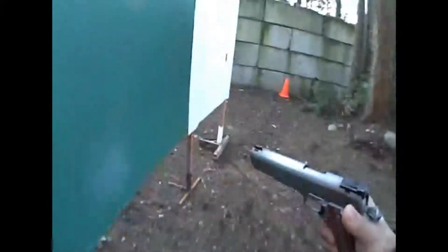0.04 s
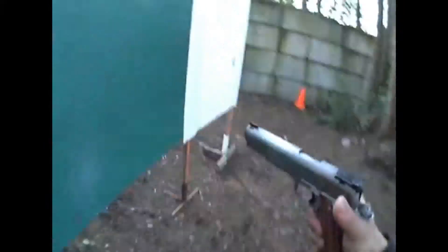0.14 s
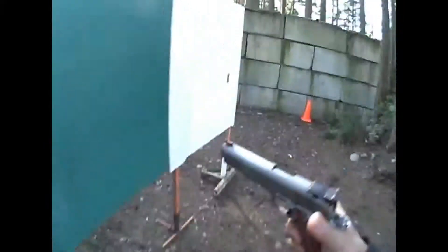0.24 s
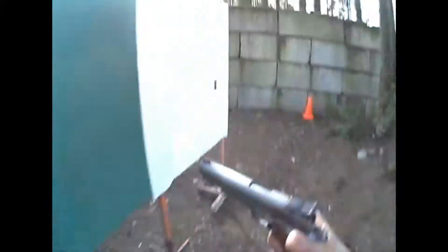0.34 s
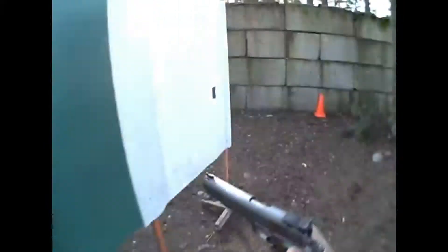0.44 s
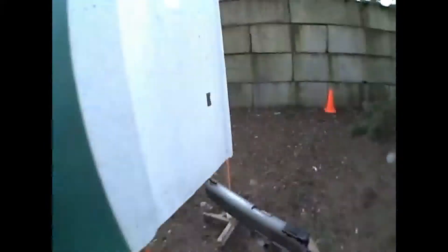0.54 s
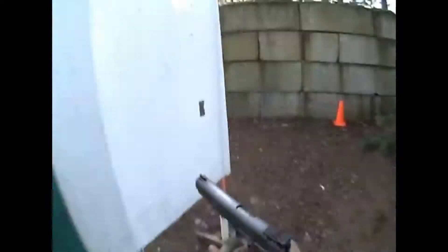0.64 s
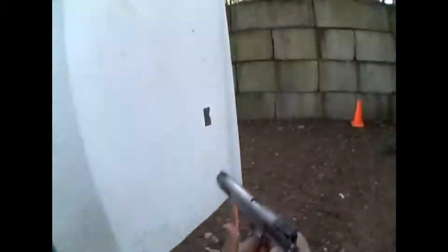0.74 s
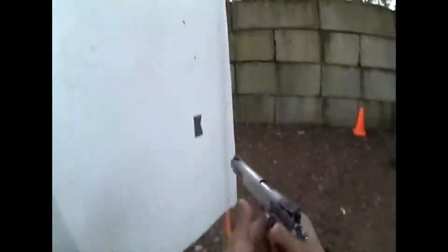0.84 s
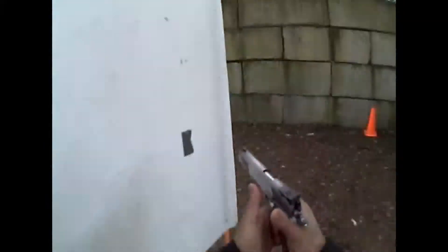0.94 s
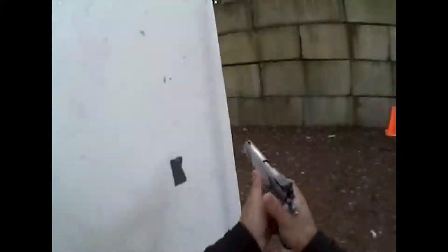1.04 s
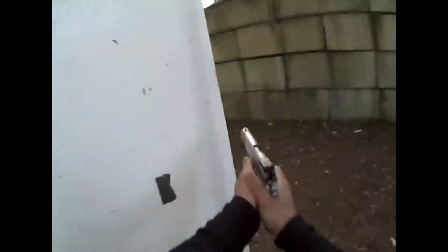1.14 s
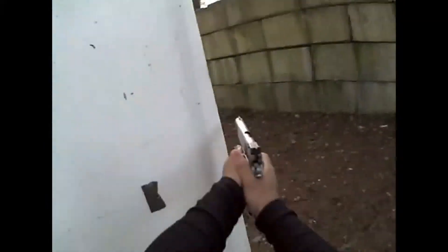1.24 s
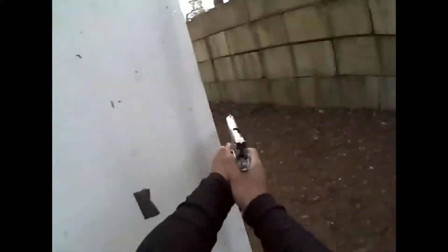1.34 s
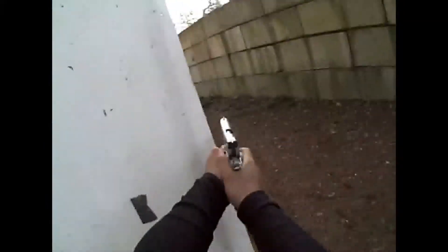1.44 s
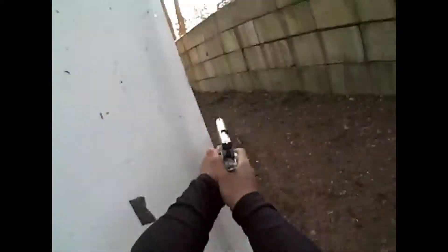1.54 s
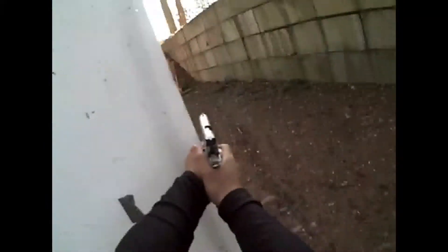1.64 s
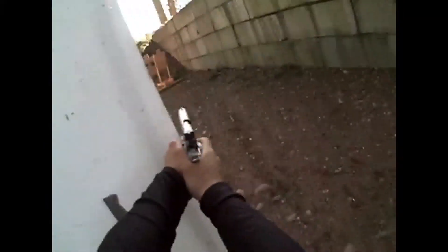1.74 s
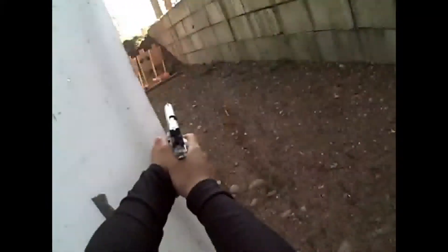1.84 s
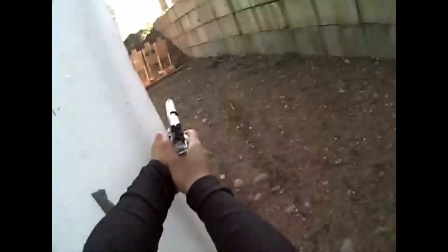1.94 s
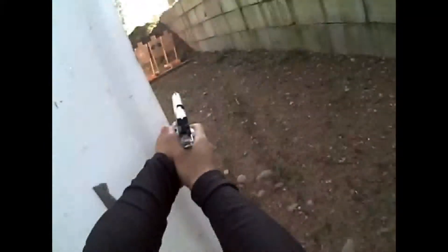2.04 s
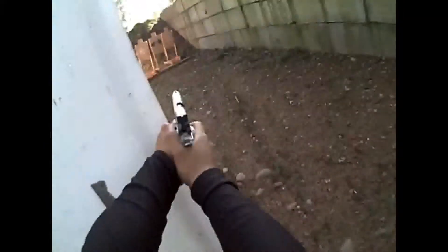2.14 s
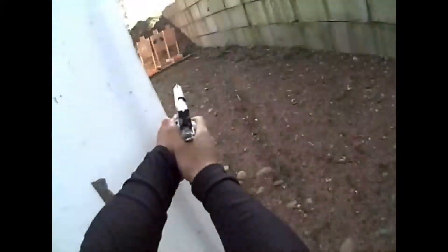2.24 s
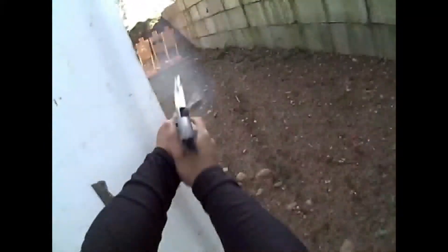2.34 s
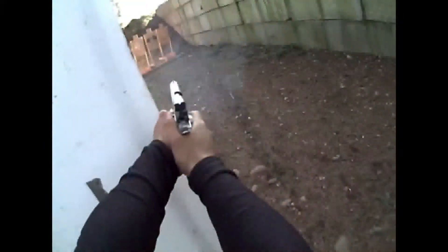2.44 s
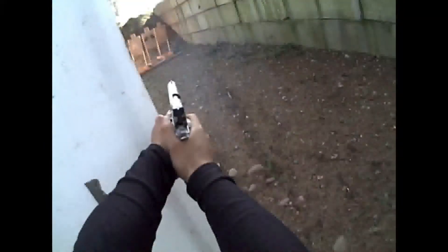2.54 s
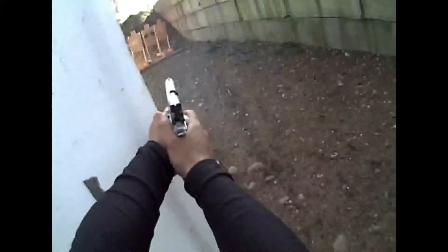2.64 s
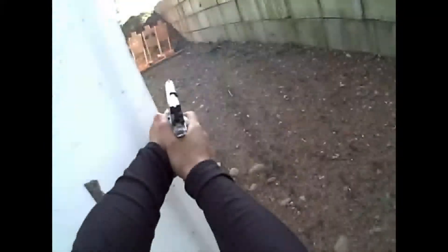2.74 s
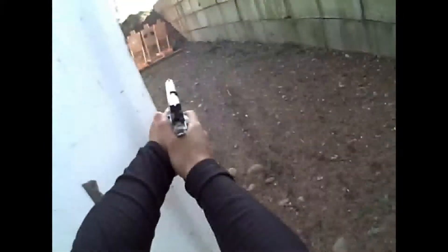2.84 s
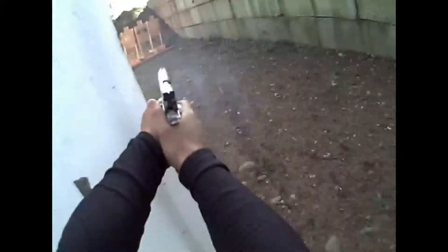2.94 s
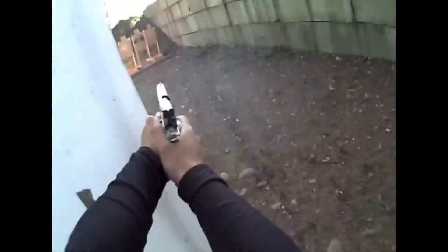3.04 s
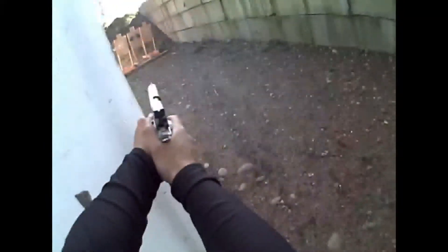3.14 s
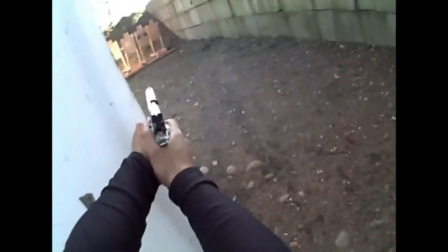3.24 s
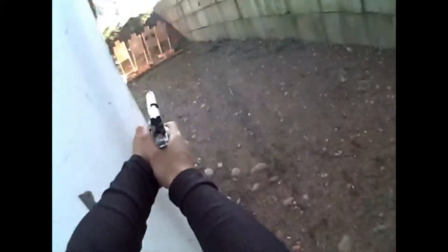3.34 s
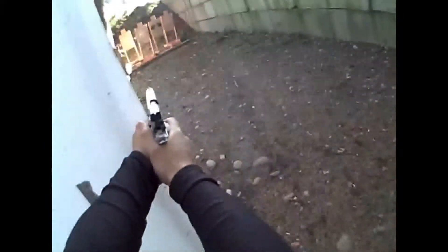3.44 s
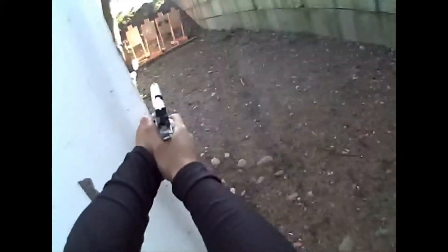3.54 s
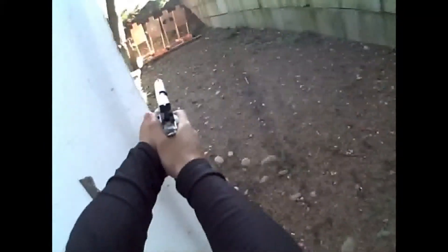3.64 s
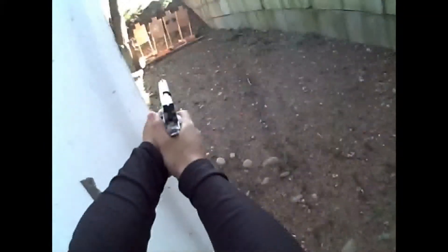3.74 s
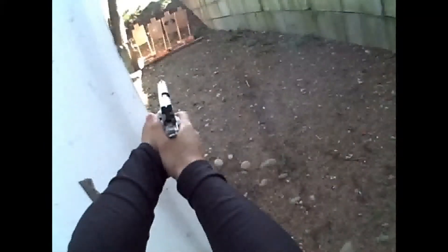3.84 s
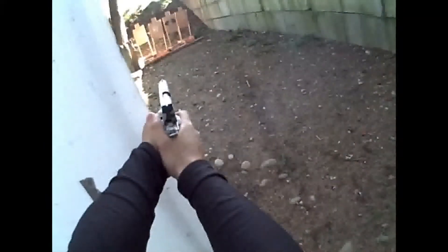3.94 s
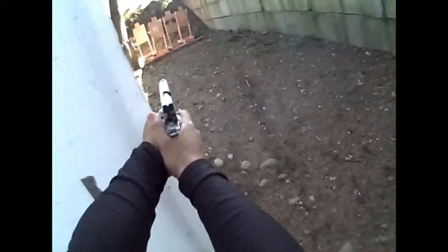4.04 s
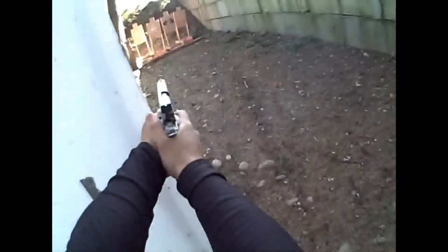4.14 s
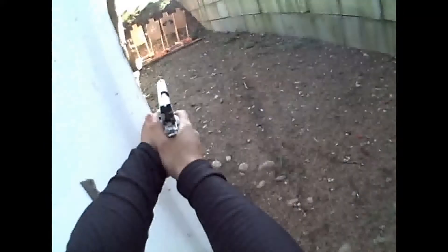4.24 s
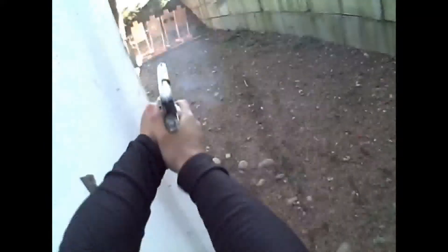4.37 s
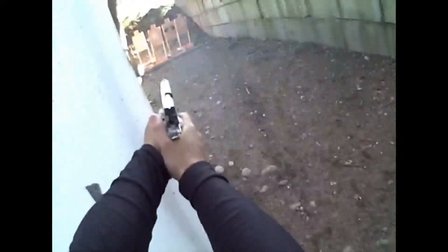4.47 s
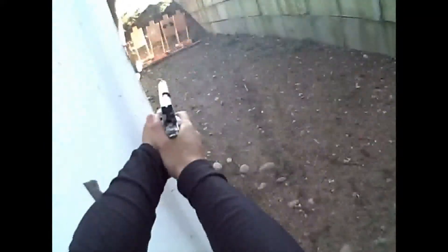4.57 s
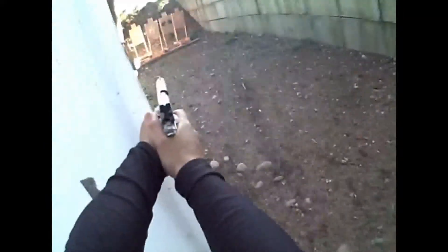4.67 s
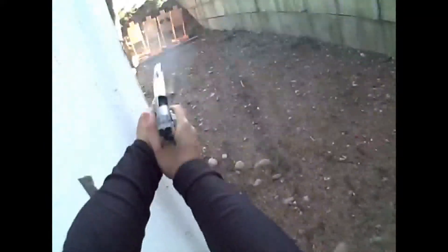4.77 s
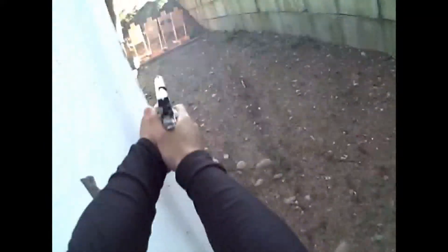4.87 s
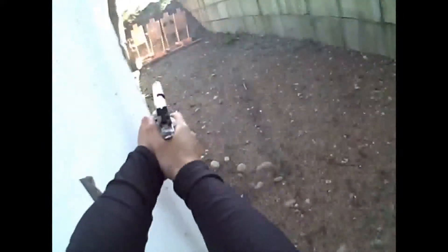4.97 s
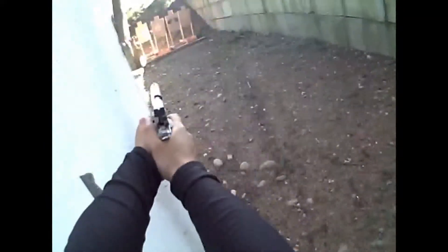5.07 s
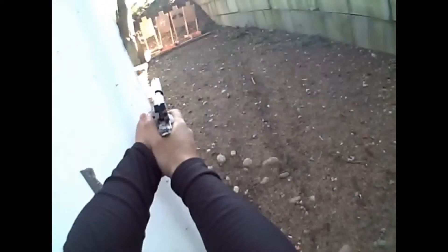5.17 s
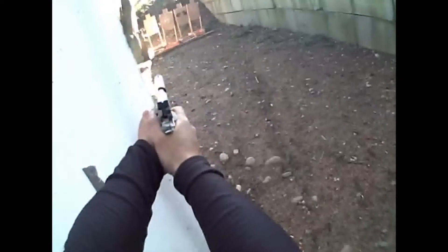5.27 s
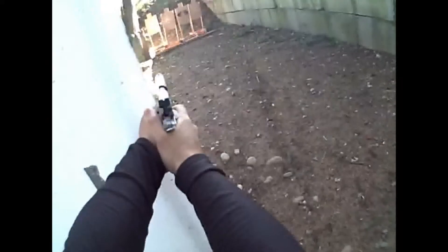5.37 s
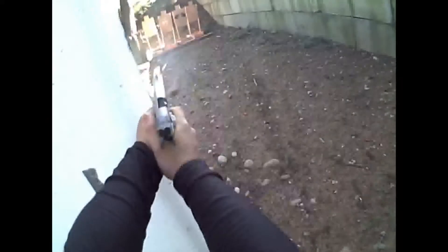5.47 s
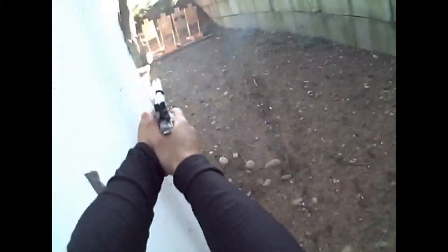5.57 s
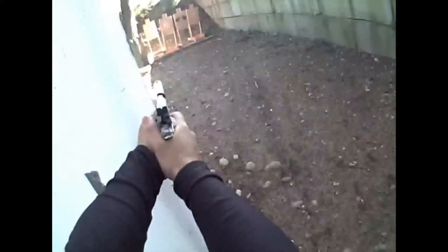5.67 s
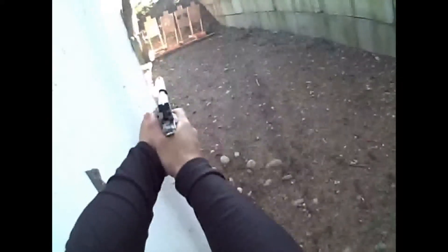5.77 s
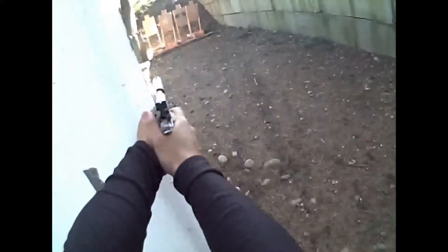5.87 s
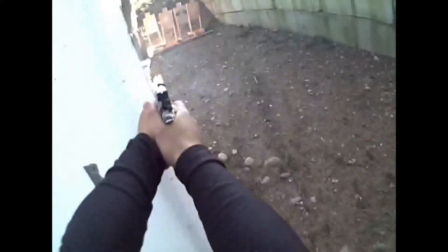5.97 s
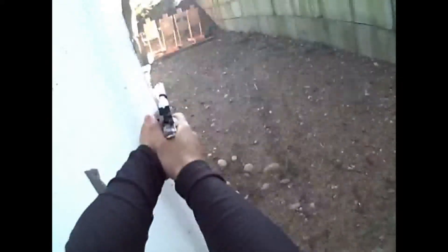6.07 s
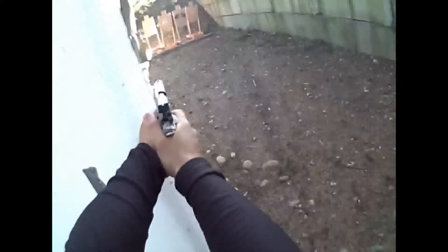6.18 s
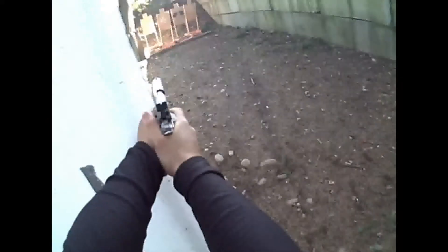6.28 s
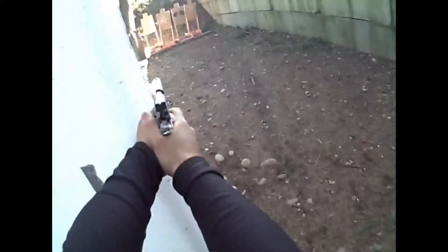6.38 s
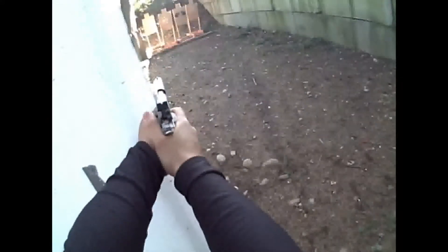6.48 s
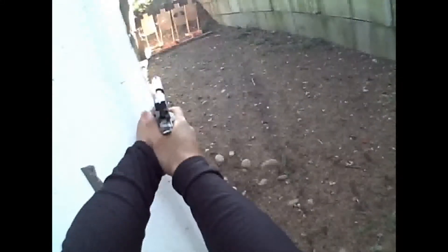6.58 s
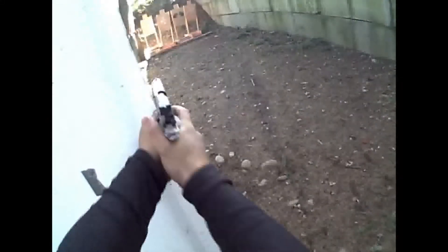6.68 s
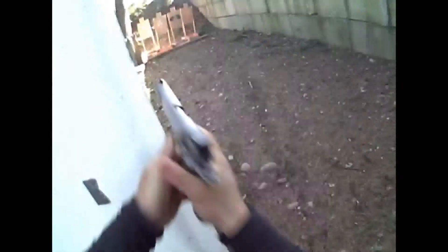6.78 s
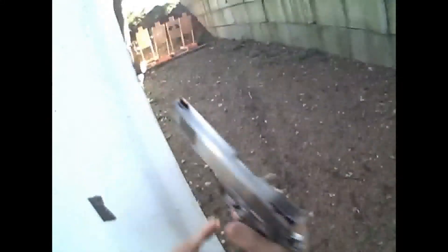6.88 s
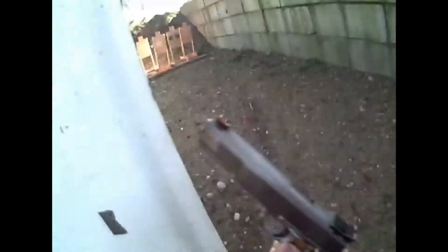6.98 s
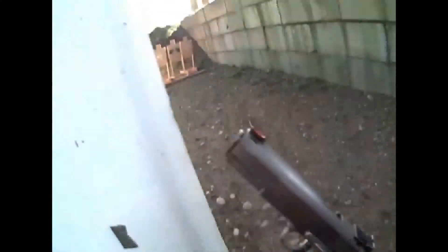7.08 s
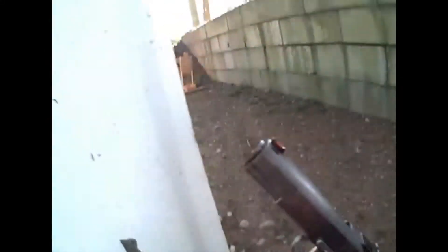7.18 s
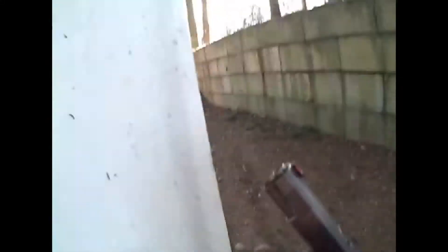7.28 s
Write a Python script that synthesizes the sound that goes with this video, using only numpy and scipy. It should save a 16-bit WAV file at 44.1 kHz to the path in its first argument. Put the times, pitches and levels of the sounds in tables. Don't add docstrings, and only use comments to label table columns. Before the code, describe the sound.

Close pistol blasts crack and distort on a head-worn microphone, each quieter than the last, after wind buffeting, gear clicks and far shots.

```python
import sys
import numpy as np
from scipy import signal
from scipy.fft import rfft, irfft
from scipy.io import wavfile
from scipy.ndimage import uniform_filter1d

SR = 44100
rng = np.random.default_rng(int(sys.argv[2]) if len(sys.argv) > 2 else 0)


def field_ratio(decibels):
    return 10 ** (np.asarray(decibels, dtype=float) / 20)


def store_pcm(level_fs):
    pcm = np.round(np.clip(level_fs, -1, 1) * 32767).astype(np.int16)
    wavfile.write(sys.argv[1], SR, np.atleast_2d(pcm).T)


N = 322415

# frequency in Hz, level in dB per Hz.
BLAST_SPECTRUM = [(88, -32), (150, 2.5), (542, -4), (818, 1), (1000, -8), (3280, -7.5), (5770, -5.5),
                  (8260, -12.5), (9000, -35.5), (11700, -66), (19800, -120)]
# frequency in Hz, level in dB per Hz.
WOODS_SPECTRUM = [(71, -33), (120, -7), (172, -6), (318, -8), (348, -4), (875, -2), (4210, -17.5),
                  (8220, -40), (9000, -58), (11700, -91), (19800, -120)]
# frequency in Hz, reverberation time in s.
WOODS_T60 = [(200, 4.2), (800, 3.2), (3000, 2.5), (8000, 0.3)]
# frequency in Hz, level in dB per Hz.
ROAR_SPECTRUM = [(24, -36.5), (40, -8), (90, -1.5), (281, -13), (484, -6.5), (933, -5.5), (1540, -11.5),
                 (5990, -13.5), (8220, -19.5), (9000, -43), (11700, -72), (19800, -120)]
# frequency in Hz, reverberation time in s.
BERM_T60 = [(100, 0.81), (700, 0.98), (3000, 1), (8000, 0.84)]


def evened(x):
    return x / np.sqrt(np.mean(x ** 2) + 1e-20)


def read(points, hz):
    f, value = np.transpose(points)
    return np.interp(np.log(hz + 1), np.log(f + 1), value)


def add(mix, s, sound):
    at = round(s * SR)
    sound = sound[max(-at, 0):]
    part = mix[max(at, 0):][:len(sound)]
    part += sound[:len(part)]


def coloured(spectrum, size):
    hz = np.fft.rfftfreq(size, 1 / SR)
    white = rfft(rng.standard_normal(size))
    return evened(irfft(white * field_ratio(read(spectrum, hz)), size))


def tail(spectrum, t60, size, patchy_db=1.5):
    hz = np.fft.rfftfreq(512, 1 / SR)
    t = np.arange(size // 128 + 5) * 128 / SR
    a, b, patches = rng.standard_normal((len(t), len(hz), 3)).T
    patches = uniform_filter1d(patches, size=9, axis=0)
    patches = evened(uniform_filter1d(patches, size=5, axis=1))
    colour = field_ratio(read(spectrum, hz))[:, None]
    decay_db = -60 * t / read(t60, hz)[:, None]
    z = (a + 1j * b) * colour * field_ratio(patchy_db * patches + decay_db)
    sound = signal.istft(z, nperseg=512, noverlap=384)[1][:size]
    return sound / np.sqrt(np.sum(colour ** 2) * 8 / 3)


def stretched(t60, factor):
    return [(hz, s * factor) for hz, s in t60]


def swells(rows):
    t = np.arange(0, N + 64, 64) / SR
    gains = 0
    for s, db, rise, fall in rows:
        away = np.where(t < s, (s - t) / rise, (t - s) / fall)
        gains = gains + field_ratio(db - 20 * away)
    return np.interp(np.arange(N) / SR, t, gains)


def far_shot(roar_db, thump_db, roll_db, roll_time):
    swell_s = 0.067
    roar_time = .82
    t = np.arange(2 * SR) / SR
    thump = -np.sin(2 * np.pi * 540 * t * np.exp(-t / 0.066)) * np.exp(-t / 0.0054)
    roar = tail(ROAR_SPECTRUM, stretched(BERM_T60, roar_time), len(t), patchy_db=-0.44)
    dull = signal.lfilter(*signal.butter(2, 1300, fs=SR), roar)
    early = np.exp(-(t / swell_s) ** 2)
    roar = (1 - 0.1 * early) * dull + (1 - 0.61 * early) * (roar - dull)
    onset_s = .001 if thump_db > roar_db else .025
    roar *= np.clip(t / onset_s, 0, 1)
    held = field_ratio(60 * np.minimum(t, 1.8 * swell_s) / (roar_time * BERM_T60[1][1]))
    roll = tail(WOODS_SPECTRUM, stretched(WOODS_T60, roll_time), len(t)) * np.clip(t / 0.03, 0, 1)
    return field_ratio(thump_db) * thump + field_ratio(roar_db) * roar * held + field_ratio(roll_db) * roll


def wind_and_sway():
    # time in s, sway in dB.
    calm_levels = [(0, -38), (.7, -42), (1.1, -37), (1.7, -40), (2.8, -37), (3.4, -58), (3.8, -70),
                   (4.2, -52), (4.7, -48), (5.4, -52), (5.9, -50), (6.6, -56), (7.3, -56)]
    # peak time in s, buffeting in dB, sway in dB,
    # swell and fade in s per 20 dB.
    gusts = [(0.0, -34, -32, .1), (.15, -35, -40, .06), (.214, -35, -34, .12), (.474, -41, -38, .08),
             (.646, -42, -42, .07), (.728, -41, -45, .06), (.875, -28, -38, .06), (1.086, -39, -40, .05),
             (1.17, -42, -28, .06), (1.4, -29, -23, .08), (1.5, -44, -26, .2), (1.81, -27, -34, .08),
             (1.97, -27, -29, .13), (2.8, -53, -34, .1), (3.36, -46, -50, .3), (3.7, -55, -66, .2),
             (3.876, -58, -70, .2), (4.06, -48, -46, .07), (4.16, -54, -50, .1), (4.75, -45, -48, .05),
             (5.118, -52.5, -50, .07), (5.262, -43.5, -41, .06), (5.44, -46, -53, .05),
             (5.81, -54, -44, .06), (6.47, -80, -56, .1), (6.875, -73, -51, .06), (7.12, -66, -56, .08),
             (7.27, -60, -56, .12)]
    # frequency in Hz, level in dB per Hz.
    sway_spectrum = [(1, -5), (3, 5.5), (8, 9.5), (20, -4.5), (35, -18), (60, -56.5)]
    # frequency in Hz, level in dB per Hz.
    buffet_spectrum = [(18, -29), (30, 2.5), (49, -6), (145, -17), (195, -22), (247, -27), (500, -34),
                       (650, -65), (1100, -120)]
    calm = field_ratio(np.interp(np.arange(N) / SR, *np.transpose(calm_levels)))
    sway = calm + swells((s, db, 1.5 * span, 1.5 * span) for s, _, db, span in gusts)
    buffet = calm * field_ratio(-16) + swells((s, db, span, span) for s, db, _, span in gusts)
    lumps_db = evened(uniform_filter1d(rng.standard_normal(N), size=1500))
    return sway * coloured(sway_spectrum, N) + buffet * coloured(buffet_spectrum, N) * field_ratio(lumps_db - 5.5)


def rustle():
    # peak time in s, level in dB, swell in s per 20 dB, fade in s per 20 dB.
    rubs = [(.478, -71, .1, .03), (.656, -74, .12, .02), (.75, -88, .3, .3), (1.392, -54, .04, .06),
            (1.49, -57, .07, .3), (1.634, -59, .3, .15), (3.766, -77, .2, .5), (4.15, -88, .1, 1),
            (7.078, -73, .02, .03), (7.182, -84, .1, .03), (7.31, -76, .05, .05)]
    # frequency in Hz, level in dB per Hz.
    cloth_spectrum = [(300, -12), (1500, -6), (4000, -5), (6000, 2), (8500, -4.5)]
    hiss_db = -99
    flicker_db = 1.5 * evened(uniform_filter1d(rng.standard_normal(N), size=600))
    return (field_ratio(hiss_db) + swells(rubs)) * coloured(cloth_spectrum, N) * field_ratio(flicker_db)


def circuit_whine():
    # frequency in Hz, level in dB.
    whine = (8000, -94)
    hz, db = whine
    return field_ratio(db) * np.sin(2 * np.pi * hz * np.arange(N) / SR)


def click(db, hz, t60, broad):
    t = np.arange(4000) / SR
    noise = rng.standard_normal(len(t))
    ring = signal.lfilter(*signal.iirpeak(hz, 6.0, SR), noise)
    snap = signal.lfilter(*signal.butter(3, 5000, fs=SR), noise)
    sound = (ring / ring.std() + broad * snap / snap.std()) * field_ratio(-60 * t / t60)
    return field_ratio(db) * sound / abs(sound).max()


def capsule_pulses():
    # time in s, signed
    # push as amplitude, width in s.
    pulses = [(.136, 0.03, 0.003), (.149, .025, .0013), (.157, -0.03, 0.0015), (.218, -.015, .003),
              (0.237, 0.03, 0.004), (.398, .015, .0005), (.468, -.012, .002), (0.477, -0.015, 0.0018),
              (.62, .012, .003), (.648, 0.02, 0.0015), (.72, .016, .004), (.857, -0.032, 0.0029),
              (.8075, -.03, .0005), (.879, -.035, .001), (.889, -.04, .002), (1.784, -0.045, 0.0014),
              (1.798, -.05, .003), (1.809, 0.04, 0.0039), (1.947, .06, .004), (1.953, -0.13, 0.003),
              (1.996, -0.04, 0.004), (4.096, .017, 0.011), (4.387, 0.33, 0.0055), (7.242, -.002, .0015),
              (7.312, -.004, .004)]
    t = np.arange(N) / SR
    return sum(push * np.exp(-((t - s) / width) ** 2) for s, push, width in pulses)


def bursts(rows, t, spread_db):
    out = np.zeros(len(t))
    for s, db, length in rows:
        u = np.clip(t - s, 0, 1) / length
        out += field_ratio(db + spread_db * rng.standard_normal()) * np.e * u * np.exp(-u)
    return out


def blast_in_bay(t, bay_db):
    # delay in s, level in dB, length in s.
    echoes = [
        (-.0003, 16, 0.0005),
        (.0032, 6, 0.0014),
        (.0072, 4, 0.00055),
        (0.0187, 6.5, 0.0008),
        (0.0244, -3.5, 0.001),
        (.0365, -2.5, .0008),
    ]
    # frequency in Hz, level in dB per Hz.
    bay_spectrum = [(35, -39.5), (60, -11.5), (283, -13.5), (328, 0.5), (388, -9.5), (542, -4), (1550, -9),
                    (5560, -16.5), (7940, -20.5), (9000, -41), (11700, -69), (19800, -120)]
    # frequency in Hz, reverberation time in s.
    bay_t60 = [(100, 0.48), (500, 0.41), (2000, 0.39), (8000, 0.42)]
    slap_start_s, slap_gap_s, slap_length_s = .058, .0209, .001
    slap_db, slap_loss_db = -15, 2.8
    berm_db = -23.5
    slaps = [(slap_start_s + k * slap_gap_s, slap_db - k * slap_loss_db, slap_length_s) for k in range(6)]
    air = bursts(echoes, t, spread_db=1.5) * coloured(BLAST_SPECTRUM, len(t))
    air += bursts(slaps, t, spread_db=2.5) * coloured(BLAST_SPECTRUM, len(t))
    air += field_ratio(bay_db) * tail(bay_spectrum, bay_t60, len(t)) * np.clip(t / .004, 0, 1)
    air += field_ratio(bay_db + berm_db) * tail(ROAR_SPECTRUM, BERM_T60, len(t)) * np.clip(t / 0.055, 0, 1)
    return air


def preamp_bias(t, gain_db, sag, hold, rebound, rise, fall):
    suction, suction_s, suction_width_s = .9, .0024, .001
    pinned_db = -7
    since = np.clip(t, 0, None)
    after = np.clip(t - hold, 0, None)
    drop = 1 - np.exp(-np.clip(t + .0006, 0, None) / .0004)
    recovery = np.exp(-after / rise)
    bias = -sag * drop * recovery
    bias += rebound * (1 - recovery) * np.exp(-(after / fall) ** 1.6)
    bias -= .13 * rebound * after / fall * np.exp(-after / (1.6 * fall)) * np.exp(-since)
    pinned = np.clip((gain_db - pinned_db) / 3, 0, 1)
    return bias - suction * pinned * np.exp(-((t - suction_s) / suction_width_s) ** 2)


def shot(gain_db, bay_db, roll_db, *bias_settings):
    t = np.arange(2 * SR) / SR - .005
    air = blast_in_bay(t, bay_db)
    roll = field_ratio(roll_db) * tail(WOODS_SPECTRUM, WOODS_T60, len(t)) * np.clip(t / .12, 0, 1)
    late_db = 3 * np.exp(-np.clip(t, 0, None) / .03)
    return field_ratio(gain_db + late_db) * np.tanh(air) + preamp_bias(t, gain_db, *bias_settings) + roll


def spent_case():
    # start in s, level in dB, frequency in Hz, reverberation time in s.
    casing = (4.115, -71, 7650, .3)
    s, db, hz, t60 = casing
    t = np.arange(SR // 2) / SR
    return s, field_ratio(db - 60 * t / t60) * np.sin(2 * np.pi * hz * t) * np.clip(t / .02, 0, 1)


def scene():
    # start in s, roar in dB, thump in dB, roll in dB, roll length as a factor.
    far_shots = [
        (-.12, -48.5, -60, -41.5, 0.69),
        (.807, -31.5, -26.5, -37, 2.3),
        (1.66, -49.5, -38, -44.5, 1.4),
        (1.783, -45.5, -45, -39.5, 0.96),
        (2.1021, -10, -9.5, -36.5, 1.4),
        (4.24, -51, -67, -58, 1.05),
        (5.26, -56, -65, -54, 0.82),
        (7.2, -70, -80, -70, 1.1),
    ]
    # start in s, peak in dB, frequency in Hz, decay to -60 dB in s, broad share.
    clicks = [(.118, -51, 2800, .025, .3), (0.282, -60, 4000, .025, .8), (.3955, -48, 2500, 0.015, 2.9),
              (.3955, -46, 895, .03, 0.39), (.4314, -59, 3000, 0.027, 1.2), (0.4786, -48, 6160, 0.016, .1),
              (.644, -55, 5700, .06, .1), (1.783, -21, 1850, 0.014, 0.25), (1.783, -26, 3650, 0.014, 0.37),
              (1.9415, -25.5, 2200, 0.027, .15), (1.942, -41, 5450, .02, .8), (1.977, -40, 2380, 0.11, .1),
              (6.709, -72, 6550, .03, .3), (6.804, -68.5, 8060, 0.032, .1), (7.077, -68, 6500, .07, .2),
              (7.149, -71, 5000, .03, .3), (7.165, -69, 5000, .04, .3), (7.24, -57.5, 3500, 0.024, 1.6)]
    # start in s, gain in dB, bay tail in dB, slow roll in dB.
    own_shots = [
        (2.4109, 6.5, -1.5, -47),
        (2.952, -2, -1, -42),
        (4.372, -4, -3, -48),
        (4.812, -7, -3, -54.5),
        (5.5132, -9, -1.5, -51),
        (5.9445, -10.5, -2.5, -58),
    ]
    # sag as amplitude, time held down in s, rebound as amplitude,
    # rebound rise in s, rebound fall in s.
    biases = [
        (1.15, .0375, 1.0, .0018, .045),
        (.62, .033, .23, .009, .15),
        (.45, .035, .17, .008, .14),
        (.4, .036, .19, .004, .11),
        (.34, .031, .085, .016, .25),
        (.27, .028, .115, .055, .27),
    ]
    mix = wind_and_sway() + rustle() + circuit_whine() + capsule_pulses()
    for s, *row in far_shots:
        add(mix, s, far_shot(*row))
    for s, *row in clicks:
        add(mix, s, click(*row))
    for (s, *row), bias in zip(own_shots, biases):
        add(mix, s - .005, shot(*row, *bias))
    add(mix, *spent_case())
    return mix[None]


def low_pass(x, hz):
    return signal.oaconvolve(x, signal.firwin(601, hz, window=("kaiser", 11), fs=SR)[None], "same")


def top_cut(x):
    return signal.sosfilt(signal.butter(12, 16670, fs=SR, output="sos"), x)


def record(dry):
    rail, overshoot = .67, 1.053
    edge_hz, top_hz, smear_db = 8600, 16140, -13.5
    clipped = rail * np.clip(dry / rail, -1, 1)
    treble = signal.lfilter(*signal.butter(2, 1000, "high", fs=SR), clipped)
    window = signal.windows.hann(520) ** 2
    treble_power = signal.oaconvolve(treble ** 2, window[None] / window.sum(), "same")
    smear = field_ratio(smear_db) * np.sqrt(abs(treble_power)) * coloured(BLAST_SPECTRUM, N)
    narrow = low_pass(clipped + smear, edge_hz)
    ceiling = rail * overshoot
    wide = low_pass(ceiling * np.clip(narrow / ceiling, -1, 1), top_hz)
    return top_cut(wide)


dry = scene()
out = record(dry)
store_pcm(out)
```